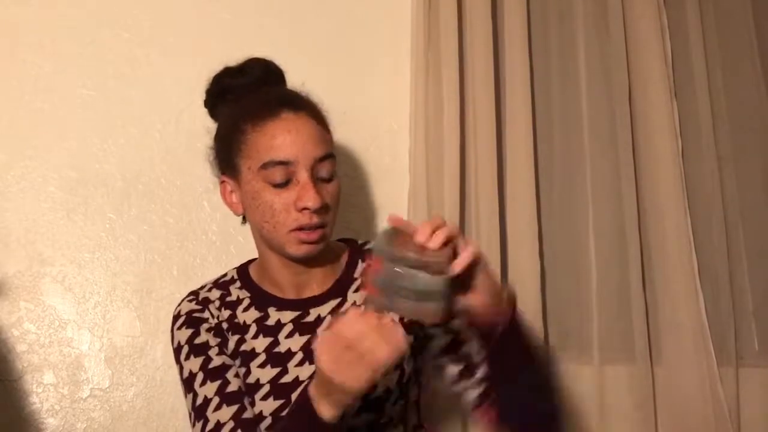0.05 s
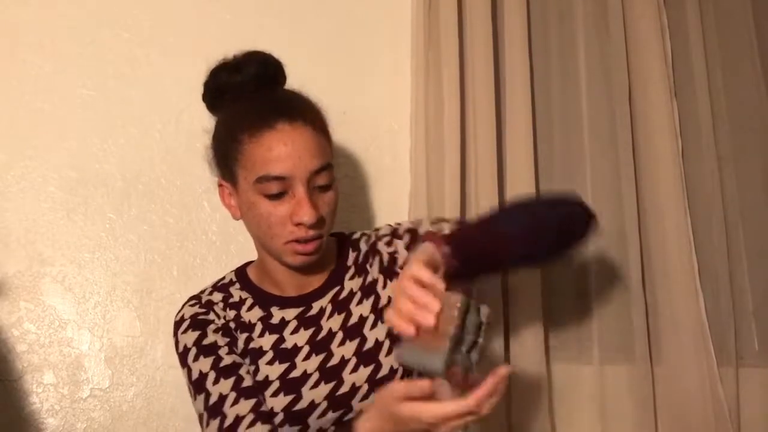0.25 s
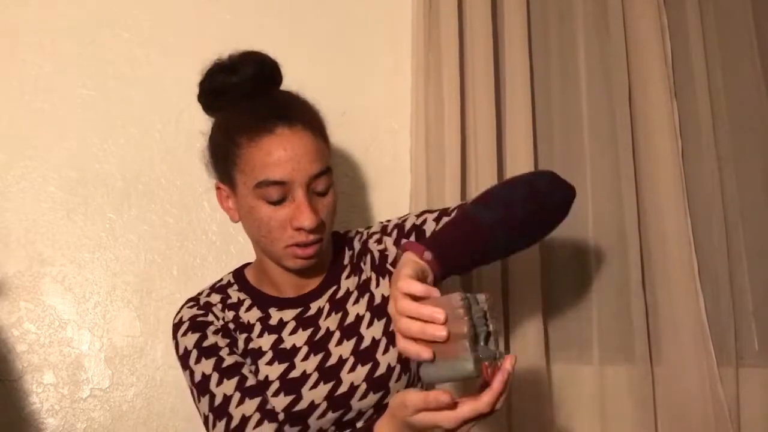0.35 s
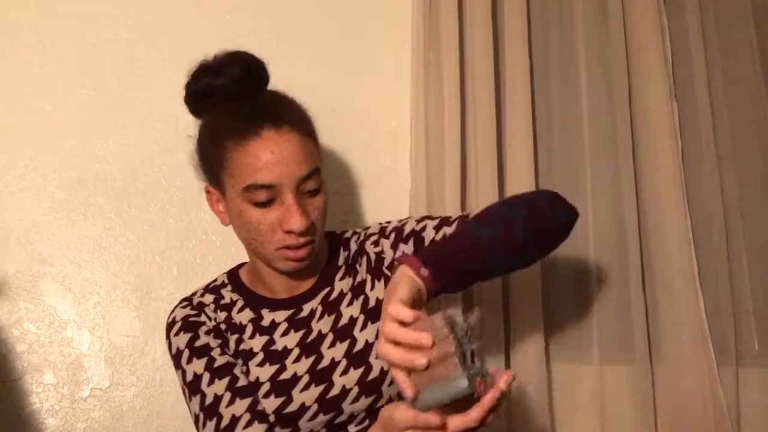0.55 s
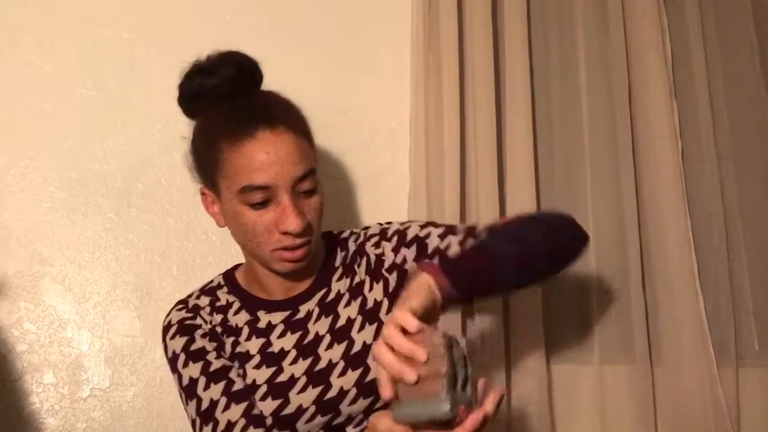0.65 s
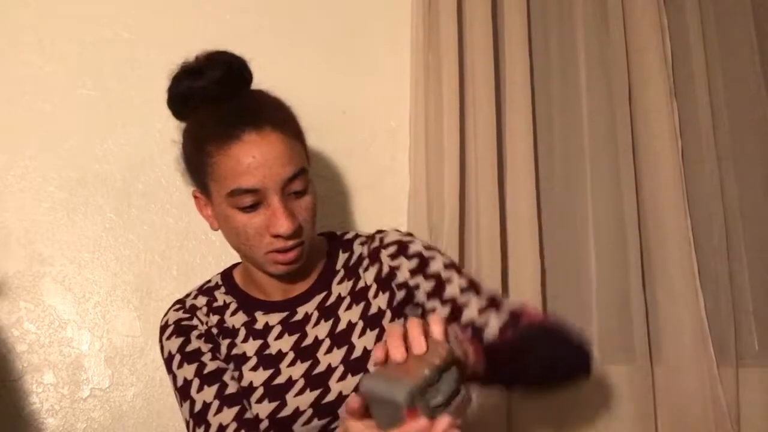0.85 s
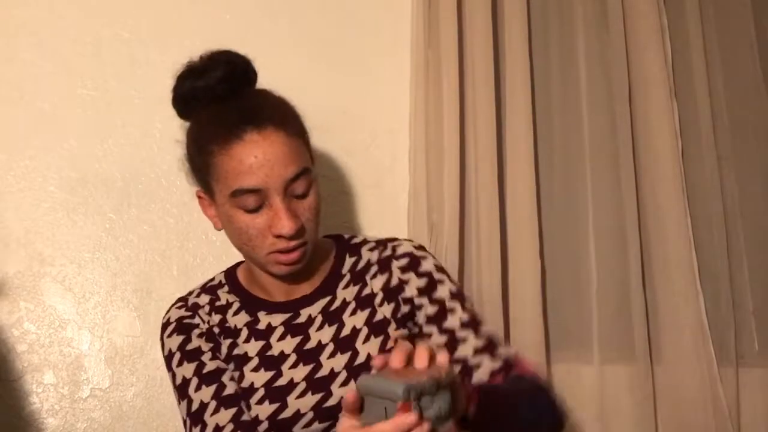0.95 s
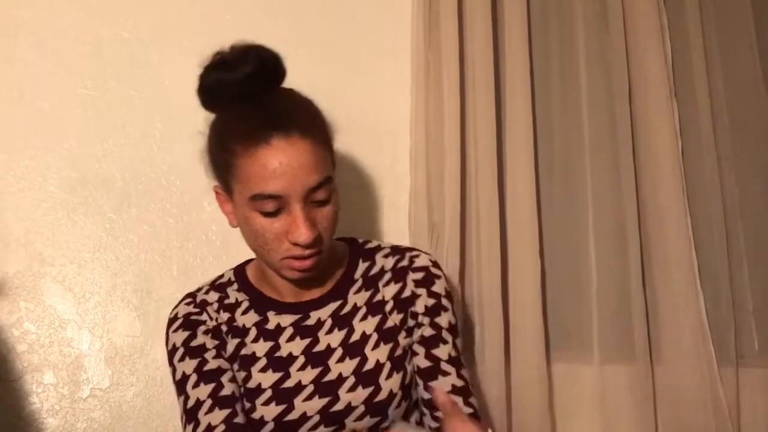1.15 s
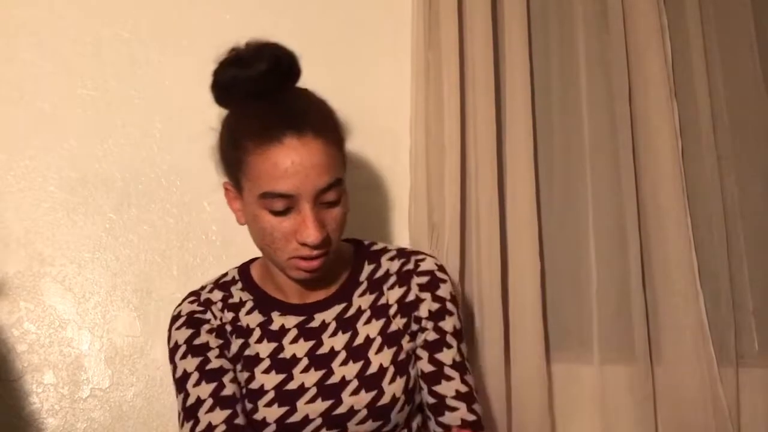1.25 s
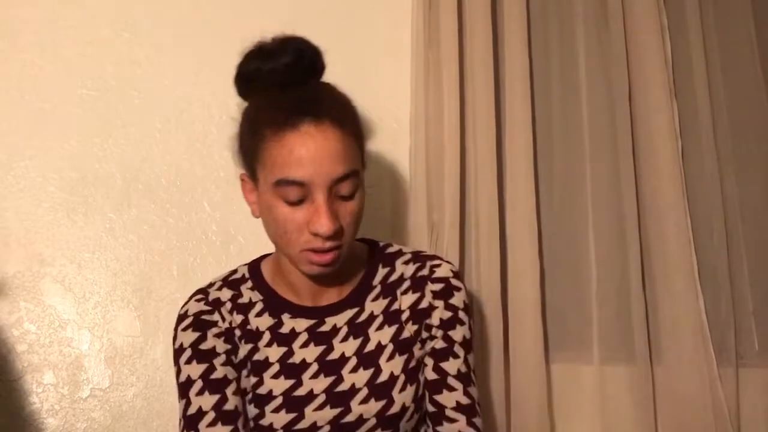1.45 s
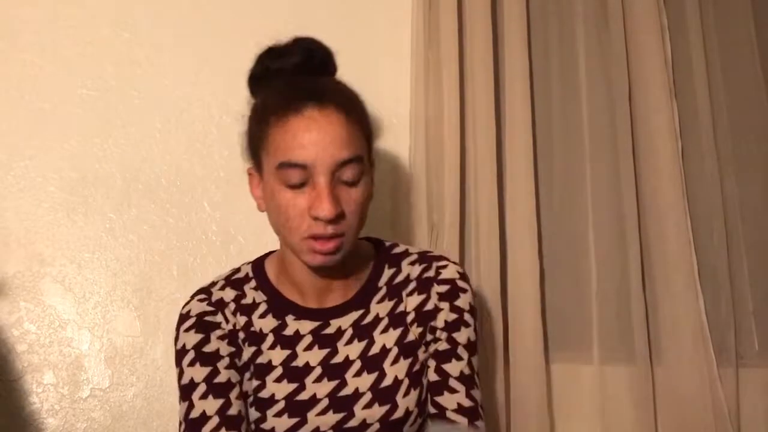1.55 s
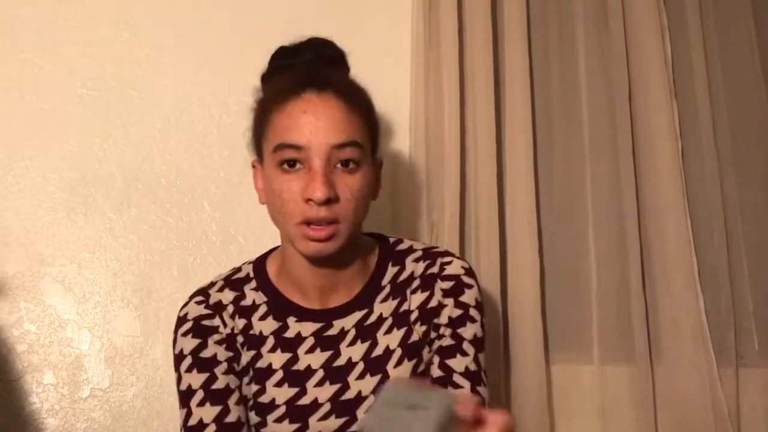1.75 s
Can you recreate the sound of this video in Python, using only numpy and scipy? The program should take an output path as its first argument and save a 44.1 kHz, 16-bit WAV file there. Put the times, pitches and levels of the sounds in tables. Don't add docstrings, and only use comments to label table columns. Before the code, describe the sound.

A coin rattles in a hollow plastic money box. Quiet hiss and low hum hold faint ticks until 0.2 s, when bright hard clacks burst out, strongest at 0.21-0.32 s, continuing more lightly to 0.62 s. Sparse clicks come around 0.87-0.96 s, a firmer cluster at 1.29-1.33 s, a soft lap thud at 1.54 s, then small ticks to 1.79 s. Faint sleeve rustle, short room echoes.

```python
import sys
import numpy as np
from scipy import signal
from scipy.fft import rfft, irfft
from scipy.io import wavfile
from scipy.ndimage import uniform_filter1d

SR = 44100
rng = np.random.default_rng(int(sys.argv[2]) if len(sys.argv) > 2 else 0)


def nominal_scale(level):
    x = np.asarray(level, float) / 20
    return 10 ** x


def to_wav(s):
    ch = np.atleast_2d(s).T
    pcm = np.round(np.clip(ch, -1, 1) * 32767)
    wavfile.write(sys.argv[1], SR, pcm.astype(np.int16))


N = 79380

# start_s, peak_db,
# floor_panel_db, side_panel_db, edge_and_tick_db
LANDINGS = [(0.0853, -64.5, 13, -2, 2), (0.107, -64, 14, -4, 10.5), (0.1135, -54.5, -10, 4.5, 1),
            (0.126, -40, 18.5, 11, -7.5), (0.164, -62, 12.5, 11.5, 11), (0.19, -61, -6.5, -4.5, 3),
            (0.2043, -37, 6.5, 3, -4), (0.2142, -9.5, -0.5, 8, 11), (0.2205, -15.5, -6.5, 5.5, 12.5),
            (0.2326, -12.5, -16.5, -14, 15.5), (0.2836, -45.5, -14, -11.5, -11),
            (0.2908, -42, -14, 2.5, 5.5),
            (0.3202, -9.5, -0.5, 5.5, 11.5), (0.338, -28, -9, 13, 10), (0.341, -29.5, 9, -15, 14),
             (0.3575, -24.5, 1, -13, -9), (0.3642, -27.5, -5, 4, -2), (0.3756, -39.5, 22.5, 11, 8),
             (0.3826, -42, -9, -20, -24), (0.4047, -24, 6.5, -1.5, 4.5), (0.4309, -34, 1.5, -4, -24),
             (0.4565, -24.5, 1, -1, -8), (0.49, -29.5, -10, -7.5, -0.5), (0.5997, -30.5, -5.5, 1, -1),
             (0.6009, -24.5, 6, -4.5, -10.5),
            (0.7015, -81, -9, -15, 19), (0.7896, -63, 16.5, 9, -1), (0.873, -38.5, 9, -2, -18.5),
            (0.8949, -45.5, -7, 3, -12.5), (0.9017, -35, 6, 4.5, 1), (0.9214, -30.5, 3.5, 1, 1),
            (0.9506, -39, -3, 11, 9), (0.9556, -33.5, 5.5, 7, -4), (1.0848, -50, 11.5, 10, 6.5),
            (1.0973, -58, 7.5, 10.5, 2), (1.29, -25.5, 5, 2, 3.5), (1.2966, -26.5, -22, -16.5, 19.5),
            (1.3016, -34.5, 0, -3.5, 9), (1.3087, -27.5, -18, -5.5, 2), (1.372, -46, 19, 0.5, 14),
            (1.391, -48, 7.5, -7.5, 2.5), (1.3941, -46.5, -0.5, 12, -12), (1.4594, -39, 3, 1.5, -11.5),
            (1.5547, -50.5, 7, 3, -7), (1.5855, -47, 4.5, -1, -19.5), (1.595, -41.5, 3, -12, -26),
           (1.6049, -55, 5, -13, -2), (1.6076, -49, -9, 3, 14), (1.611, -46.5, 3, 8, -3),
           (1.618, -52, 16, -11, -1), (1.6221, -27.5, -7.5, -26, -0.5), (1.626, -34.5, -18, 7, 11.5),
           (1.648, -65, -11, -1, 17), (1.653, -31.5, -5, -2.5, 1.5), (1.6657, -39.5, 1, -8, 6),
           (1.703, -58, 6, -1.5, -10), (1.7331, -51, 8, 8, -21), (1.7595, -51, -2, 15, 1),
           (1.764, -40.5, 1, -7, -36), (1.7754, -50.5, 5, 16, -12), (1.786, -53, 10, 1, -5),
            (0.2262, -31, 2, -11, 6), (0.3459, -35, -1, -4, -7), (0.3782, -35.5, 2, -12, -1),
           (0.3945, -63, -14, 3, -4), (0.4152, -35.5, -5, -10, 8), (0.4395, -47, 3, 6, -8),
           (0.466, -32, -6, 25, -5), (0.5148, -49, -14, 4, 0), (0.6213, -37, 2, -3.5, 5.5),
           (0.9315, -48, 7, 16, 0), (1.2904, -31, -12, 24, -3.5), (1.2975, -43.5, -1.5, 1, -3),
           (1.3073, -33.5, -18, -3, 12), (1.311, -27, 1, 0, 10.5), (1.3183, -35, -6, -5, 4),
           (1.3193, -42.5, 15, -10, 11), (1.325, -48, 3, 0, 1), (1.4686, -50.5, 18, 1.5, 6),
           (1.6325, -49, 22, -12, 4), (1.6768, -56, 23, -12, 2), (1.6816, -46.5, 11, 18, 0)]

# pitch_hz, level_db, time_to_fall_60_db_s
FLOOR_PANEL = [(1716, -18.5, 0.011), (2190, -10.5, 0.013), (2408, -13, 0.018)]
SIDE_PANEL = [(2957, -12, 0.015), (3168, -12, 0.0086), (3230, -7, 0.02), (3820, -15.5, 0.02)]
LID = [(4020, -7, 0.009), (4287, -11, 0.0089), (4410, -10, 0.018), (5080, -7.5, 0.0027), (5406, -8, 0.011),
       (5540, -7, 0.009), (5900, -9.5, 0.01), (6540, -11, 0.008)]
EDGE = [(7220, -6, 0.0038), (8400, -14, 0.002), (8660, -16.5, 0.0051), (9870, -7.5, 0.0018),
        (11550, -16.5, 0.0019), (14600, -21, 0.0068)]
COIN = [(12250, -46, .07), (12720, -47, .07)]
HOLLOW = [(363, -50, 0.094), (926, -39.5, 0.017), (1188, -41.5, 0.0067)]
SCATTER_DB, DETUNE = 2.2, 0.015
TICK_HZ, TICK_S, TICK_DB = 6400, 0.00008, -1
BOX_DB, PEAK_DB = -5, 4
RADIATES_ABOVE_HZ = 1500
LID_SPLIT_HZ = 4800

INSIDE_SHORTEST_S, INSIDE_LONGEST_S, INSIDE_FADE_S = 0.00012, 0.00045, 0.003
CLEAR_HARD, CLEAR_LOSS_PER_DB, CLEAR_SOFT = 0.995, 0.022, 0.7

# time_s, treble_db, hollow_db
SLOT = [(0.215, -4, -3.5), (.233, 0, 13), (.32, 6.5, -13), (.34, 6, 1), (.365, 15, -3.5), (.404, -1, 4.5),
        (.456, 10, 6.5), (.49, -19, 0), (.6, 12, 7), (0.875, -5, 6), (.9, -7, 7.5), (.922, -2, 5),
        (0.954, 4, 5.5), (1.289, -23, 5.5), (1.321, -6, -7), (1.46, 7, -3), (1.61, 3, 0), (1.76, -1, -5)]
# low_hz, high_hz
SLOT_BAND_HZ = (11300, 15200)
# time_s, low_against_high_lid_db, floor_pitch_factor, ring_length_factor
GRIP = [(.12, 1, 0.92, 1.2), (.214, -7, 1.0, 1.3), (.233, -3.5, 0.97, 1.1), (.32, -0.5, 0.97, 1.14),
        (.36, -5, 0.93, 1.5), (.404, 1, .97, 1.36), (.456, -5, 0.9, 0.94), (.49, -4, 0.66, 0.88),
        (.6, 0, 1.029, 1.1), (.874, 2, 1.16, 0.98), (.92, -6.5, 0.98, 1.22), (.955, 2.5, 0.92, 0.73),
        (1.29, -0.5, 1, 0.46), (1.32, 4, 1.08, 0.52), (1.46, 2.5, 0.95, .8), (1.6, 0.5, 1.05, 0.95),
        (1.62, 8, 0.81, 0.53), (1.7, -2, 0.97, 0.48)]

# start_s, level_db
THUDS = [
    (1.541, -46),
    (1.553, -84),
]
# pitch_hz, level_db, time_to_fall_60_db_s
THUD_MODES = [(335, 5, .035), (580, -1, .016), (1090, 3, .014)]
THUD_RISE_S = 0.0025

# delay_s, level_db
ECHOES = [(.0084, -15), (0.011, -31.5), (0.02, -27), (0.0275, -23.5)]
ECHO_SMEAR_S, ECHO_TOP_HZ = 0.0016, 8000
# pitch_hz, level_db, time_to_fall_60_db_s
TAIL = [(1200, -31.5, 0.094), (2376, -45, 0.2), (4500, -43.5, 0.2), (6710, -66.5, 0.14), (12870, -34, 0.14)]
TAIL_RISE_S = 0.005
PLACES = [0, .31, .4, .45, .55, .85, .915, 1.2, 1.44, 1.615, 1.65, 1.75]
# time_s, room_send_db
SHADING = [(0, 5), (.2, -2), (.33, -2), (.39, 0.5), (.6, 3), (.9, 2.5), (1.3, 3.5), (1.6, 1), (1.8, 8)]
SHUDDER_DB, SHUDDER_S = 2.2, 0.003

# pitch_hz, level_db_per_hz
HISS = [(35, -24), (60, 2), (537, -7), (817, -12), (985, -10), (1190, -11.5), (2450, -15), (3550, -20),
        (15800, -22.5)]
HISS_DB, FLICKER_DB = -68, 0.6
HUM_HZ, HUM_WIDTH_HZ, HUM_DB = 54.3, 17, -69
# time_s, level_db
SLEEVE = [(0, -99), (0.098, -70.5), (.18, -70), (.6, -77), (0.749, -83), (1.101, -78.5), (1.22, -84),
          (1.35, -71.5), (1.552, -69.5), (1.8, -67)]
SLEEVE_HZ, SLEEVE_WIDTH_HZ = 5000, 16000

MIC_LOW_HZ, MIC_TOP_HZ = 42, 15900
MIC_DIP_HZ, MIC_DIP_WIDTH_HZ, MIC_DIP = 10500, 1600, 0.55


def band(x, hz, width_hz):
    return signal.lfilter(*signal.iirpeak(min(hz, 0.45 * SR), hz / width_hz, fs=SR), x)


def add(out, start_s, sound):
    i = int(start_s * SR)
    out[i:i + len(sound)] += sound[:len(out) - i]


def ring(modes, gains, stretch, length=6000):
    hz, db, t60 = np.array(modes, float).T[:, :, None]
    t = np.arange(length) / SR
    sines = np.sin(2 * np.pi * hz * stretch[:, None] * t)
    fade = np.exp(-np.log(1000) * t / t60)
    return (nominal_scale(db) * gains[:, None] * sines * fade).sum(axis=0)


def background():
    f = np.maximum(np.arange(N // 2 + 1) * SR / N, 1)
    hz, db = np.array(HISS).T
    colour = nominal_scale(np.interp(np.log(f), np.log(hz), db))
    hiss = irfft(rfft(rng.standard_normal(N)) * colour, N)
    walk = uniform_filter1d(rng.standard_normal(N), size=3000)
    flicker_db = FLICKER_DB * walk / walk.std()
    hum = band(rng.standard_normal(N), HUM_HZ, HUM_WIDTH_HZ)
    return nominal_scale(HISS_DB + flicker_db) * hiss / hiss.std() + nominal_scale(HUM_DB) * hum / hum.std()


def sleeve():
    brush = band(rng.standard_normal(N), SLEEVE_HZ, SLEEVE_WIDTH_HZ)
    level_db = np.interp(np.arange(N) / SR, *np.array(SLEEVE).T)
    return nominal_scale(level_db) * brush / brush.std()


def room():
    t = np.arange(int(0.4 * SR)) / SR
    early = np.zeros(len(t))
    for delay_s, db in ECHOES:
        early += nominal_scale(db) * (t >= delay_s) * np.exp(-np.abs(t - delay_s) / ECHO_SMEAR_S)
    early = early * rng.standard_normal(len(t)) / np.sqrt(ECHO_SMEAR_S * SR / 2)
    early = signal.lfilter(*signal.butter(1, ECHO_TOP_HZ, fs=SR), early)
    late = np.zeros(len(t))
    for hz, db, t60 in TAIL:
        noise = band(rng.standard_normal(len(t)), hz, 0.41 * hz)
        late += nominal_scale(db + 10 * np.log10(SR / 2 / hz)) * noise * np.exp(-np.log(1000) * t / t60)
    return early + late * (1 - np.exp(-t / TAIL_RISE_S))


def shudder():
    walk = uniform_filter1d(rng.standard_normal(N), size=int(SHUDDER_S * SR))
    walk = uniform_filter1d(walk, size=int(SHUDDER_S * SR / 2))
    return nominal_scale(SHUDDER_DB * walk / walk.std())


def room_echoes(dry):
    t = np.arange(N) / SR
    send = dry * nominal_scale(np.interp(t, *np.array(SHADING).T))
    wet = np.zeros(N)
    for begin_s, end_s in zip(PLACES, PLACES[1:] + [N / SR]):
        here = send * (t >= begin_s) * (t < end_s)
        wet += signal.fftconvolve(here, room())[:N]
    return wet * shudder()


def thud():
    out = np.zeros(N)
    knock = ring(THUD_MODES, np.ones(3), np.ones(3))
    swell = 1 - np.exp(-np.arange(len(knock)) / SR / THUD_RISE_S)
    for start_s, db in THUDS:
        add(out, start_s, nominal_scale(db) * knock * swell)
    return out


def inside_echoes(x, lags, clear):
    echo = np.eye(1, 800)[0]
    for lag in lags:
        a = np.zeros(lag + 1)
        a[0], a[-1] = 1, clear
        echo = signal.lfilter(a[::-1], a, echo)
    fade = np.exp(-np.arange(len(echo)) / SR / INSIDE_FADE_S)
    return signal.fftconvolve(x, echo * fade)[:len(x)]


def contact_tick(t):
    bump = np.exp(-0.5 * (t / TICK_S - 3) ** 2)
    return -nominal_scale(TICK_DB) * np.cos(2 * np.pi * TICK_HZ * (t - 3 * TICK_S)) * bump


def knocks():
    out = np.zeros(N)
    rows = LANDINGS
    parts = [FLOOR_PANEL, SIDE_PANEL, LID, EDGE]
    modes = np.array(sum(parts, []))
    part = np.repeat(np.arange(4), [len(p) for p in parts])
    lid_side = (part == 2) * np.sign(LID_SPLIT_HZ - modes[:, 0])
    t = np.arange(4000) / SR
    tick = contact_tick(t)
    times = np.array([row[0] for row in rows])
    small = signal.butter(4, RADIATES_ABOVE_HZ, "high", fs=SR, output="sos")
    dull = signal.butter(4, SLOT_BAND_HZ[0], fs=SR, output="sos")
    bright = signal.butter(3, SLOT_BAND_HZ, "band", fs=SR, output="sos")
    slot_s, slot_treble_db, slot_hollow_db = np.array(SLOT).T
    grip_s, *grip_columns = np.array(GRIP).T

    for start_s, db, floor_db, side_db, edge_db in rows:
        loud, pitch, sign, odd = rng.standard_normal((4, len(modes)))

        tilt_db, tune, damp = [np.interp(start_s, grip_s, column) for column in grip_columns]
        held = modes * [1, 1, np.clip(damp, 0.3, 1.5)]
        stretch = (1 + DETUNE * pitch) * np.where(part == 0, tune, 1)
        part_db = np.array([floor_db, side_db, 0, edge_db])[part]
        gains = nominal_scale(part_db + tilt_db * lid_side + SCATTER_DB * loud) * np.sign(sign)
        panels = nominal_scale(BOX_DB) * ring(held, gains, stretch, len(t))
        hit = signal.sosfilt(small, panels + nominal_scale(edge_db / 2) * tick)

        lags = (rng.uniform(INSIDE_SHORTEST_S, INSIDE_LONGEST_S, 2) * SR).astype(int)
        clear = np.clip(CLEAR_HARD + CLEAR_LOSS_PER_DB * (db + 10.5), CLEAR_SOFT, CLEAR_HARD)
        hit = inside_echoes(hit, lags, clear)

        treble = nominal_scale(np.interp(start_s, slot_s, slot_treble_db))
        hit = signal.sosfilt(dull, hit) + treble * signal.sosfilt(bright, hit)

        flight_s = np.min(times[times > start_s], initial=N / SR) - start_s
        choke = np.clip((flight_s - t) / 0.0038, 0, 1)
        coin = treble * ring(COIN, nominal_scale(SCATTER_DB * odd[:2]), np.ones(2), len(t)) * choke

        slot_db = np.interp(start_s, slot_s, slot_hollow_db) * np.array([0, 1, 1])
        hollow_gains = nominal_scale(floor_db + slot_db + SCATTER_DB * odd[2:5] / 2)
        hollow = ring(HOLLOW, hollow_gains, 1 + 4 * DETUNE * odd[5:8], len(t))
        add(out, start_s, nominal_scale(db + PEAK_DB) * (hit / np.abs(hit).max() + coin + hollow))
    return out


def scene():
    dry = knocks() + thud()
    return (dry + background() + sleeve() + room_echoes(dry))[None]


def low_pass(x):
    return signal.sosfilt(signal.butter(12, 16970, fs=SR, output="sos"), x)


def record(dry):
    x = dry - MIC_DIP * band(dry, MIC_DIP_HZ, MIC_DIP_WIDTH_HZ)
    x = signal.sosfilt(signal.butter(2, MIC_LOW_HZ, "high", fs=SR, output="sos"), x)
    x = signal.sosfilt(signal.cheby1(8, 0.5, MIC_TOP_HZ, fs=SR, output="sos"), x)
    return low_pass(x)


dry = scene()
out = record(dry)
to_wav(out)
```